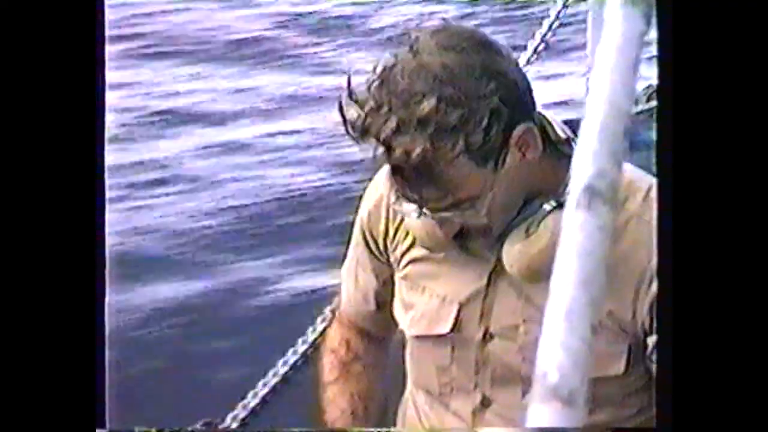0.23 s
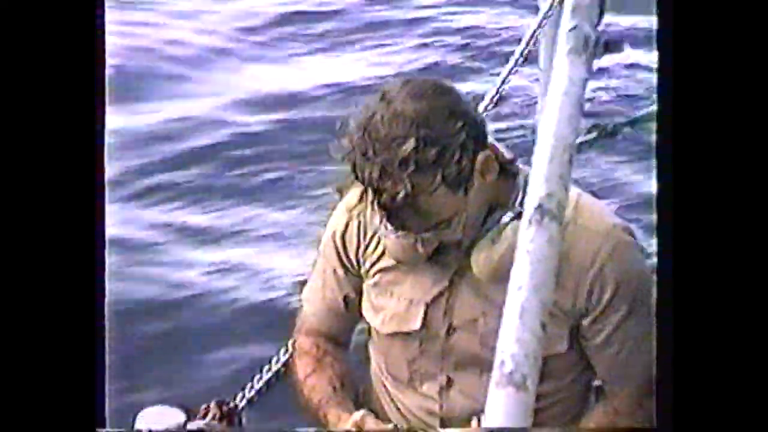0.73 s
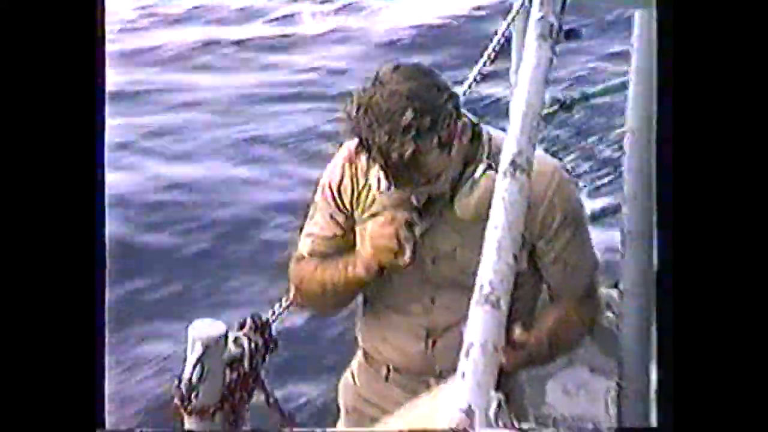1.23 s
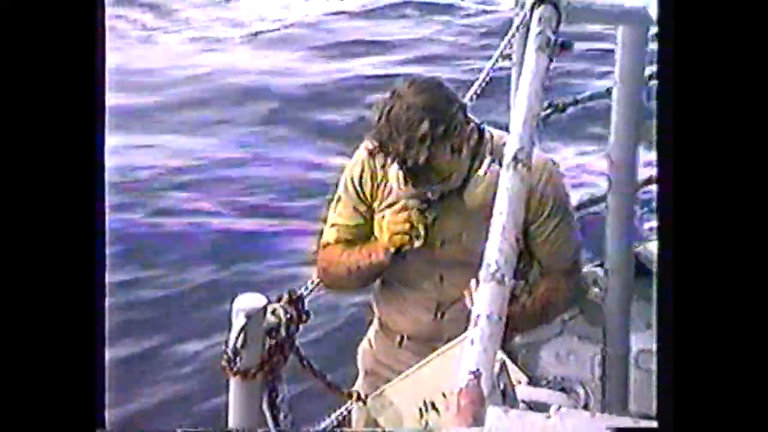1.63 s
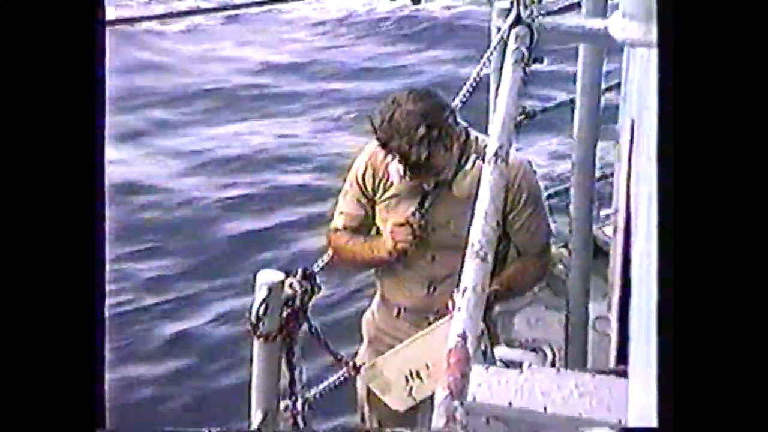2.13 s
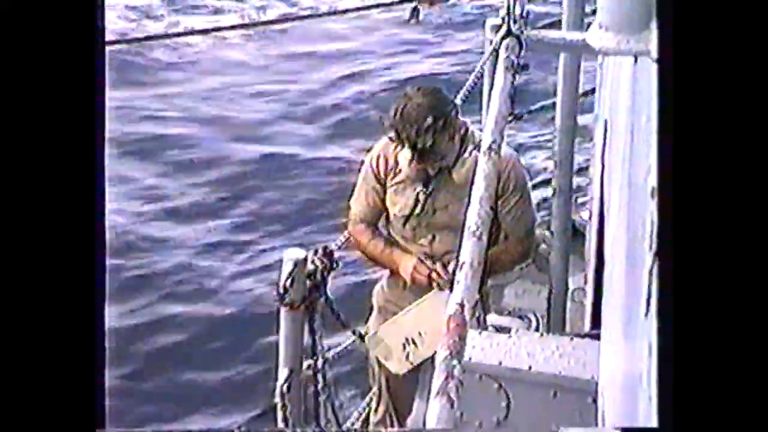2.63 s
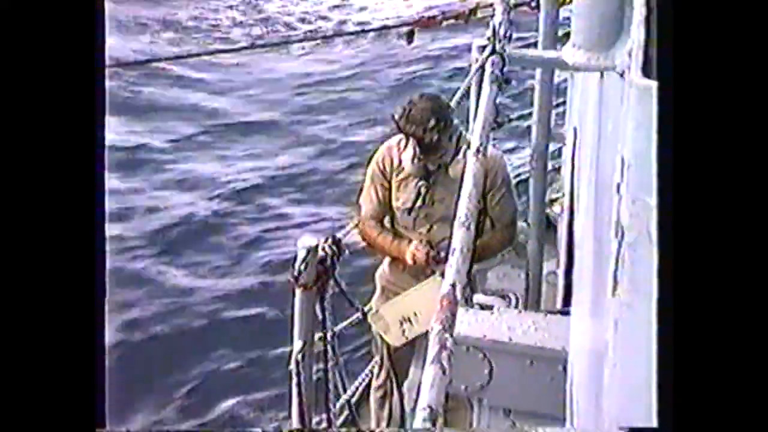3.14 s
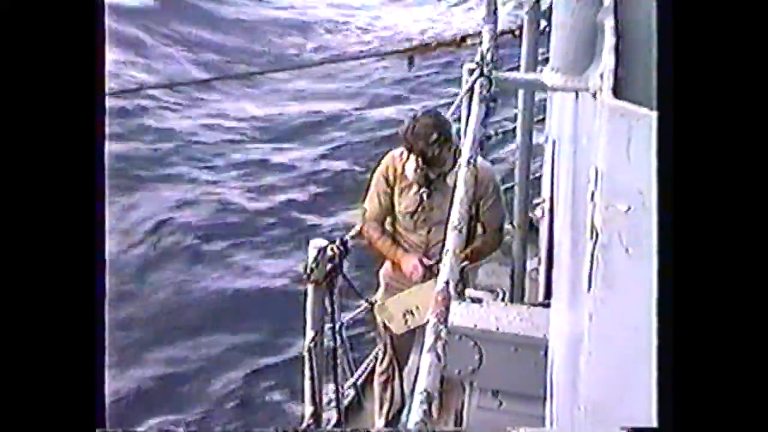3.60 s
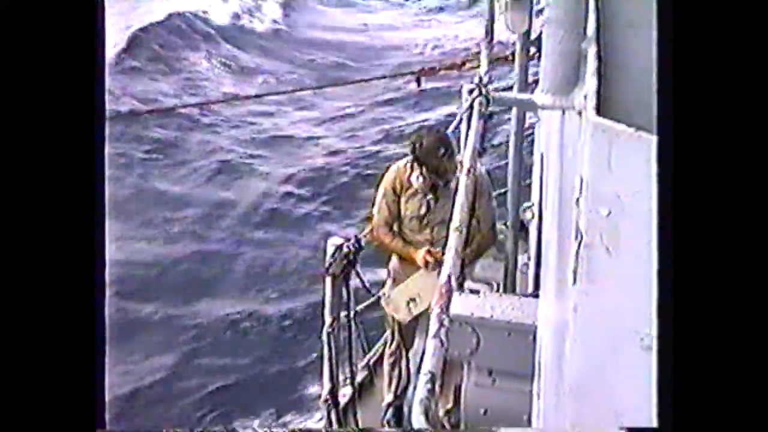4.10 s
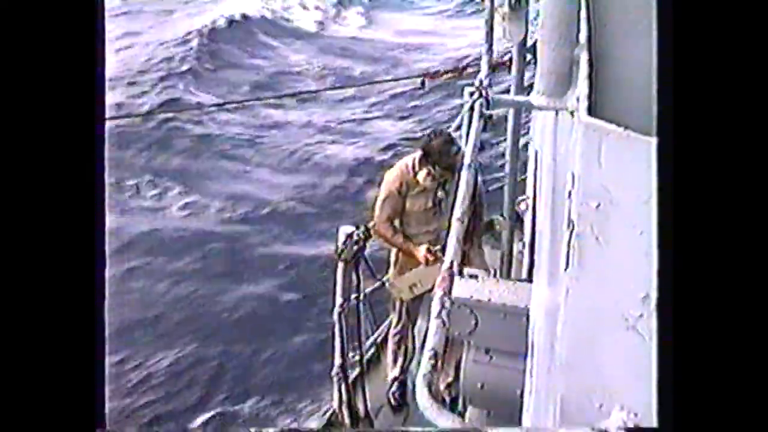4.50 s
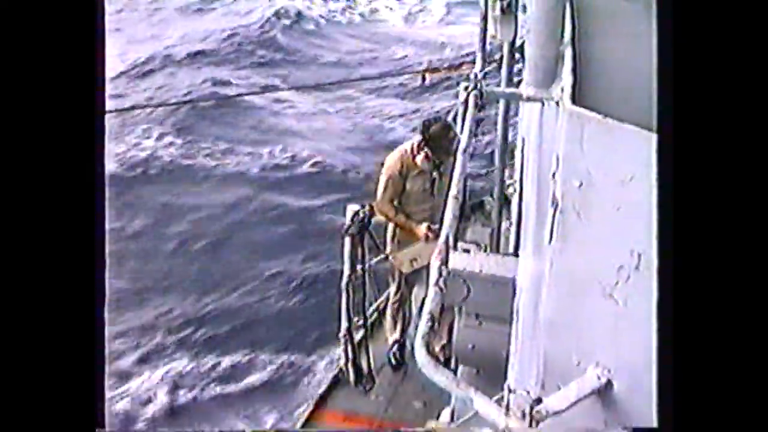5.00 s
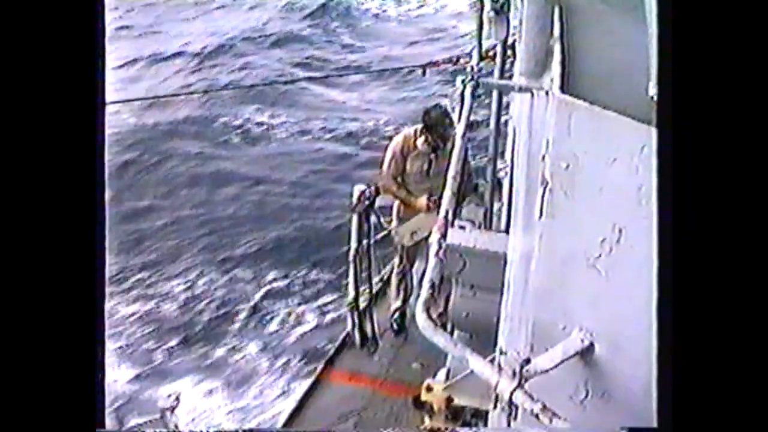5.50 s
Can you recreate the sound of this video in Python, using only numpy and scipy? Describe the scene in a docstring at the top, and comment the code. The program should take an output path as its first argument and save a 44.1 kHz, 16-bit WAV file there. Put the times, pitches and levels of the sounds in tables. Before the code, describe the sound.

Open deck under way in strong wind: churning wash and foam hiss fill the foreground, mixed with wavering engine hum and airy exhaust roar. Low gust rumble comes and goes on the exposed microphone. The level sinks for under a second after the midpoint, recovers, and a loose metal part knocks and clinks twice. The rush continues to the end through a rough old camcorder sound.

```python
"""The open deck of a ship under way in a strong wind.
The sea along the hull is shaped noise: a churning wash under hissing foam. Engine harmonics hum, and
resonated noise roars from the exhaust and vents. Gusts rumble on the microphone as low noise.
The level dips briefly past the middle, then a loose fitting clinks twice: damped sines and a dull knock.
The recorder's uneven sample clock lays a gritty sheen over the treble."""
import sys
import numpy as np
from scipy import signal
from scipy.fft import rfft, irfft
from scipy.io import wavfile
from scipy.ndimage import map_coordinates

SR = 44100
rng = np.random.default_rng(int(sys.argv[2]) if len(sys.argv) > 2 else 0)


def output_pcm(signal):
    """Save a mono or channel-first signal as 16-bit PCM at the path in sys.argv[1].

    Samples are clipped to [-1, 1] before scaling.
    """
    pcm = np.clip(np.atleast_2d(signal).T, -1, 1) * 32767
    wavfile.write(sys.argv[1], SR, np.round(pcm).astype(np.int16))


N = 253575


def from_db(db):
    """Decibels to gain."""
    return 10 ** (np.asarray(db) / 20)


def rms_one(x):
    """Scale to unit rms."""
    return x / np.sqrt(np.mean(x ** 2) + 1e-20)


def in_time(rows):
    """Interpolate each column of a curve at every sample; the first column is time in seconds."""
    times_s, *columns = np.transpose(rows)
    return [np.interp(np.arange(N) / SR, times_s, column) for column in columns]


def swells(rows):
    """Smooth passing changes of level in dB, each a raised cosine centred on its time."""
    t = np.arange(N) / SR
    total_db = np.zeros(N)
    for middle_s, length_s, change_db in rows:
        position = np.clip((t - middle_s) / length_s, -0.5, 0.5)
        total_db += change_db * np.cos(np.pi * position) ** 2
    return total_db


def drift(rate_hz):
    """Slow random wander of spread 1: noise through two equal low-pass poles."""
    step = 40  # samples per computed point
    r = np.exp(-2 * np.pi * rate_hz * step / SR)
    settle = 2000
    noise = rng.standard_normal(N // step + 2 + settle)
    slow = signal.lfilter([1], [1, -2 * r, r * r], noise)[settle:]
    return np.interp(np.arange(N) / step, np.arange(len(slow)), rms_one(slow))


def colour(x, spectrum):
    """Weight a signal by a spectrum, interpolated over log frequency; rms 1."""
    hz, db = np.transpose(spectrum)
    bins_hz = np.maximum(np.fft.rfftfreq(N, 1 / SR), 1)
    gain = from_db(np.interp(np.log(bins_hz), np.log(hz), db))
    return rms_one(irfft(rfft(x) * gain, N))


# Wash along the hull. Each row: frequency in Hz, relative density in dB per Hz.
WASH_SPECTRUM = [(60, -30), (130, -5), (270, -4), (400, -3.5), (600, 0.5), (800, 1), (1000, -1.5),
                 (1250, -7), (1600, -16.5), (2200, -27.5), (4000, -71)]


def wash(rush_db, level_db=-3.5, churn_db=0.66):
    """Countless bubbles along the hull merge into a churning roar."""
    water = colour(rng.standard_normal(N), WASH_SPECTRUM)
    return water * from_db(rush_db + level_db + churn_db * drift(21))


# Bursting foam. Each row: frequency in Hz, relative density in dB per Hz.
FOAM_SPECTRUM = [(600, -20), (1200, 4.5), (1600, -0.5), (2000, -3), (2500, -9.5), (3200, -13.5),
                 (3900, -25), (5200, -18), (6200, -19), (7800, -24), (9800, -16), (10800, -28),
                 (13100, -29), (14000, -30)]
FOAM_DB, FOAM_DB_PER_RUSH_DB = -32, 0.5  # level at the mean rush


def foam(rush_db, fizz_db=1.16, patches_db=0.17, side_db=-13.0):
    """Bursting foam hisses above the wash and rises with it, a little wider than the other sounds."""
    hiss_db = FOAM_DB + FOAM_DB_PER_RUSH_DB * (rush_db - rush_db.mean())
    hiss_db = hiss_db + patches_db * drift(5) + fizz_db * drift(25)
    mid, side = (colour(white, FOAM_SPECTRUM) for white in rng.standard_normal((2, N)))
    stereo = mid + from_db(side_db) * side * [[1], [-1]]
    return stereo * from_db(hiss_db)


def roar(resonances):
    """Turbulent air passes twice through each resonance."""
    out = np.zeros(N)
    for hz, width_hz, db in resonances:
        r = np.exp(-np.pi * width_hz / SR)
        section = [1 - r, 0, r - 1, 1, -2 * r * np.cos(2 * np.pi * hz / SR), r * r]
        noise = rng.standard_normal(N + SR // 2)
        air = signal.sosfilt([section, section], noise)[-N:]
        out += from_db(db) * rms_one(air)
    return out


def tones(turns, orders, flutter_db, wander_rad, flutter_hz):
    """Engine harmonics; the wind between engine and microphone shakes their level and phase."""
    out = np.zeros(N)
    for multiple, db in orders:
        phase = 2 * np.pi * (multiple * turns + rng.random()) + wander_rad * drift(flutter_hz)
        tone = np.sin(phase) * from_db(flutter_db * drift(flutter_hz))
        out += from_db(db) * rms_one(tone)
    return out


# Engine drone. Each row: multiple of the firing rate, level in dB re drone.
DRONE_ORDERS = [(2, -5)]
# Exhaust boom. Each row: frequency in Hz, width of one pass in Hz, level in dB re drone.
EXHAUST_MODES = [(169.1, 30.8, 0), (147.5, 52, -6.5)]
# Passing drone changes. Each row: middle in seconds, length in seconds, change in dB.
DRONE_CHANGES = [(0.58, 0.18, 6.5), (1.05, 0.15, 3.5), (1.962, 0.55, 4.5), (2.77, 0.2, -8), (3.6, 0.15, -4),
                 (3.81, 0.1, -6), (4.35, 0.37, -3), (5.4, 0.27, 1), (5.72, 0.36, -7)]
# Engine overtones. Each row: multiple of the firing rate, level in dB re rush.
OVERTONE_ORDERS = [(3, -18.5), (4, -9.5), (6, -22), (8, -13.5), (10, -15.5), (12, -21)]
# Vent and deckhouse resonances. Each row: frequency in Hz, width of one pass in Hz, level in dB re rush.
VENT_MODES = [(232.5, 37, -19.5), (313.3, 27.6, -14.5), (363.1, 37, -10.5), (422, 71, -11.5),
              (510.7, 85, -10), (678, 58, -11.5), (759.4, 39, -13), (856, 53, -12), (929, 33, -18.5),
              (1012, 41, -22.5), (1252, 140, -24.5)]
FIRING_HZ, SPEED_WANDER = 87.5, 0.001615  # mean rate; fractional spread
DRONE_DB = -25.5  # reference for the drone, before its changes


def machinery(rush_db, waver_db=0.9):
    """An engine at nearly steady speed: a booming drone, its overtones and the roar of the vents."""
    turns = np.cumsum(FIRING_HZ * (1 + SPEED_WANDER * drift(1.183))) / SR
    drone = tones(turns, DRONE_ORDERS, flutter_db=2.5, wander_rad=0.18, flutter_hz=4.5)
    drone += roar(EXHAUST_MODES)
    upper = tones(turns, OVERTONE_ORDERS, flutter_db=2.6, wander_rad=0.87, flutter_hz=5.1)
    upper += roar(VENT_MODES)
    drone_db = DRONE_DB + waver_db * drift(2.5) + swells(DRONE_CHANGES)
    return from_db(drone_db) * drone + from_db(rush_db) * upper


# Gusts on the microphone. Each row: full strength from in seconds, hold in seconds, rumble before dip in dB.
GUST_EVENTS = [(0.345, 0.06, -41), (1.61, 0.063, -48), (2.44, 0.04, -40), (2.62, 0.38, -37.5),
               (3.77, 0.11, -45), (4.218, 0.24, -35), (4.59, 0.25, -33), (4.89, 0.22, -37),
               (5.42, 0.41, -40)]
# Wind rumble. Each row: frequency in Hz, relative density in dB per Hz.
BUFFET_SPECTRUM = [(20, -21), (30, -20), (50, 1), (68, 7), (85, 3), (110, 6), (170, -2.5), (400, -53)]
BREEZE_DB, GUST_ATTACK_S, GUST_RELEASE_S = -46, 0.072, 0.062  # breeze: rumble between gusts


def wind(lumps_db=1.6):
    """Each gust rises out of the breeze, holds and falls; its eddies buffet the microphone in lumps."""
    power = from_db(BREEZE_DB) ** 2
    for full_s, hold_s, db in GUST_EVENTS:
        end_s = full_s + hold_s
        shape = [(full_s - GUST_ATTACK_S, 0), (full_s, 1), (end_s, 1), (end_s + GUST_RELEASE_S, 0)]
        gust, = in_time(shape)
        power = power + (from_db(db) * gust) ** 2
    rumble = colour(rng.standard_normal(N), BUFFET_SPECTRUM)
    return rumble * np.sqrt(power) * from_db(lumps_db * drift(10.0))


def ring(click, hz, t60_s):
    """A unit click sets a decaying sine of initial height 1 ringing."""
    r, w = from_db(-60 / (t60_s * SR)), 2 * np.pi * hz / SR
    return signal.lfilter([0, np.sin(w)], [1, -2 * r * np.cos(w), r * r], click + 1e-18)


# Touches of the fitting: knock, bounces, second knock.
# Each row: time in seconds, strike level in dB, brightness of the ring in dB per octave.
TOUCHES = [(4.299, -21.5, -1), (4.31, -24, -10), (4.323, -32, -4), (4.385, -27, 9)]
# Ringing modes of the fitting. Each row: frequency in Hz, level in dB re strike, t60 in seconds.
FITTING_MODES = [(1445, 0, 0.085), (1740, -12, 0.08), (2420, -9.5, 0.045)]
# Dull noise of a touch. Each row: frequency in Hz, relative density in dB per Hz.
KNOCK_SPECTRUM = [(500, -20), (1100, 2), (2000, -1), (3200, -10), (6000, -30)]
KNOCK_DB, KNOCK_T60_S = -14, 0.057  # level re strike


def fitting():
    """A small metal part knocks, bounces and rings briefly; each touch rings with its own brightness."""
    out, lowest_hz = np.zeros(N), FITTING_MODES[0][0]
    noise = colour(rng.standard_normal(N), KNOCK_SPECTRUM)
    knock_decay = from_db(-60 / (KNOCK_T60_S * SR))
    for time_s, db, tilt_db in TOUCHES:
        click = np.zeros(N)
        click[round(time_s * SR)] = from_db(db)
        envelope = signal.lfilter([1], [1, -knock_decay], click + 1e-18)
        out += from_db(KNOCK_DB) * noise * envelope
        for hz, mode_db, t60_s in FITTING_MODES:
            bright_db = tilt_db * np.log2(hz / lowest_hz)
            out += from_db(mode_db + bright_db) * ring(click, hz, t60_s)
    return out


DIP_START_S, DIP_FALL_S, DIP_HOLD_S, DIP_RECOVER_S = 3.351, 0.16, 0.62, 0.18
DIP_DEPTH_DB, DIP_CREEP_DB = -7.5, 3.5


def dip():
    """One brief dip in dB: falls fast, creeps up while it lasts, then recovers."""
    times_s = DIP_START_S + np.cumsum([0, DIP_FALL_S, DIP_HOLD_S, DIP_RECOVER_S])
    levels_db = [0, DIP_DEPTH_DB, DIP_DEPTH_DB + DIP_CREEP_DB, 0]
    return np.interp(np.arange(N) / SR, times_s, levels_db)


# Slow swings of the rush of sea and vents. Each row: time in seconds, reference level in dB.
RUSH_SURGE = [(0.0, -17), (1.08, -16.5), (1.2, -15.5), (1.7, -16), (2.2, -17.5), (2.35, -16.5),
              (2.55, -17.5), (2.82, -19), (3.03, -18), (3.33, -16.5), (4.3, -19), (4.7, -17), (5.05, -18.5),
              (5.38, -17), (5.75, -18.5)]
# Momentary changes of the rush. Each row: middle in seconds, length in seconds, change in dB.
RUSH_FLUTTERS = [(0.47, 0.057, 4), (1.09, .05, -4.5), (1.2, 0.066, 1.5), (3.008, 0.055, 3),
                 (3.075, 0.024, 4.5), (3.123, 0.035, -6.5), (3.17, 0.056, 1.5), (3.56, 0.2, -2),
                 (3.715, 0.042, 1), (3.98, 0.11, -3), (4.17, 0.08, 2), (4.275, 0.07, -1), (4.405, 0.08, 1),
                 (4.78, 0.074, 1.5), (4.875, 0.086, -3.5), (5.49, 0.075, 0), (5.555, 0.036, -3.5),
                 (5.578, 0.028, 4.5), (5.606, 0.025, 4), (5.627, 0.022, -8.5), (5.657, 0.028, 2)]
FOAM_DIP_SHARE, WIND_DIP_SHARE = 0.77, 0.32  # fractions of the dip in dB


def scene():
    """Sea and machinery share the dip, foam and wind part of it; all but the foam is central."""
    rush_db = in_time(RUSH_SURGE)[0] + swells(RUSH_FLUTTERS)
    dip_db = dip()
    deck = (wash(rush_db) + machinery(rush_db)) * from_db(dip_db)
    hiss = foam(rush_db) * from_db(FOAM_DIP_SHARE * dip_db)
    rumble = wind() * from_db(WIND_DIP_SHARE * dip_db)
    return deck + hiss + rumble + fitting()


# Periodic error of the sample clock.
# Each row: multiple of the ripple rate, left error in samples, right error in samples, left-right angle in rad.
CLOCK_ERRORS = [(1, 0.64, 1.69, 0.79), (2, 0.54, 0.46, -0.94), (3, 0.27, 0.13, 0.16)]
RIPPLE_HZ = 3897.5


def uneven_clock(x, left_lag_samples=2.04, jitter_samples=0.27):
    """Samples taken slightly early or late mirror the roar around multiples of the ripple rate."""
    n = np.arange(N)
    error = jitter_samples * rng.standard_normal((2, N))
    for multiple, left, right, angle_rad in CLOCK_ERRORS:
        phase = 2 * np.pi * multiple * RIPPLE_HZ * n / SR
        error = error + [left * np.cos(phase + angle_rad), right * np.cos(phase)]
    times = n + error - [[left_lag_samples], [0]]
    sides = [map_coordinates(side, [at], order=3, mode="nearest") for side, at in zip(x, times)]
    return np.stack(sides)


def treble_peak(x, hz=12500, width_hz=650, added_db=3.5):
    """A resonance of the recorder adds a narrow band near the top to the signal."""
    r = np.exp(-np.pi * width_hz / SR)
    numerator = np.array([1, 0, -1]) * (1 - r * r) / 2
    denominator = [1, -2 * r * np.cos(2 * np.pi * hz / SR), r * r]
    return x + from_db(added_db) * signal.lfilter(numerator, denominator, x)


CUTOFF_HZ = 14300


def record(dry, ceiling=0.52):
    """Peaks are rounded, the clock wavers, the top rings and is cut."""
    rounded = ceiling * np.tanh(dry / ceiling)
    sampled = treble_peak(uneven_clock(rounded))
    low_pass = signal.ellip(10, 0.1, 90, CUTOFF_HZ, fs=SR, output="sos")  # ripple dB, stopband dB
    return signal.sosfilt(low_pass, sampled)


dry = scene()
out = record(dry)
output_pcm(out)
```